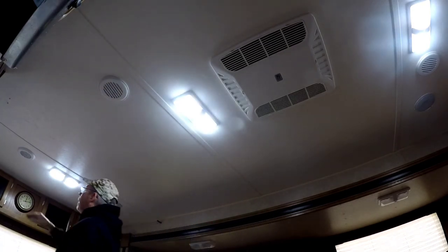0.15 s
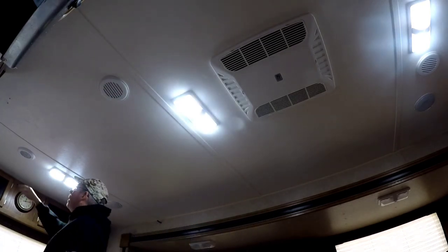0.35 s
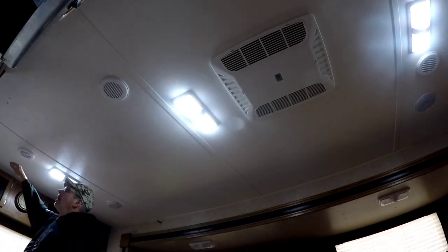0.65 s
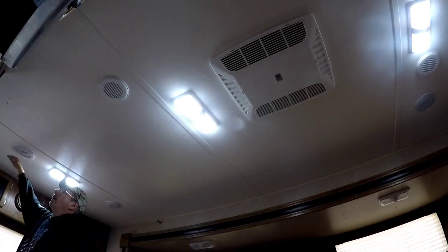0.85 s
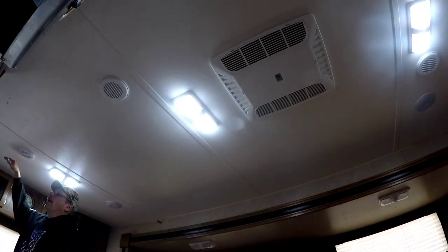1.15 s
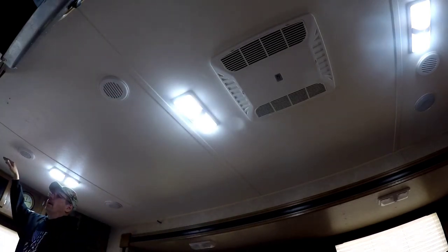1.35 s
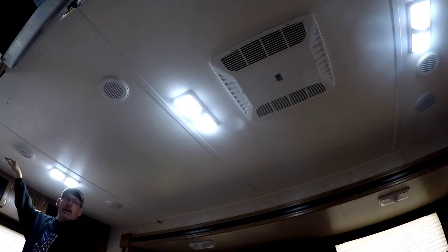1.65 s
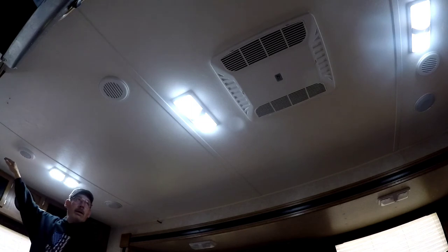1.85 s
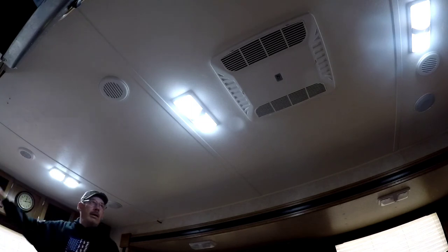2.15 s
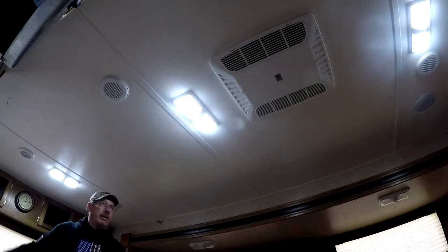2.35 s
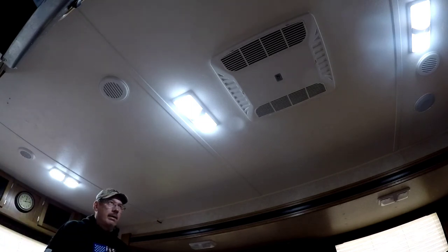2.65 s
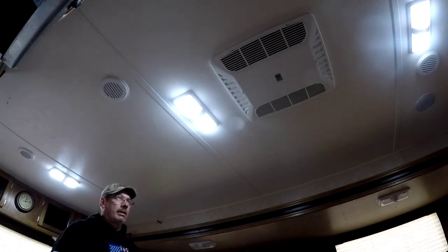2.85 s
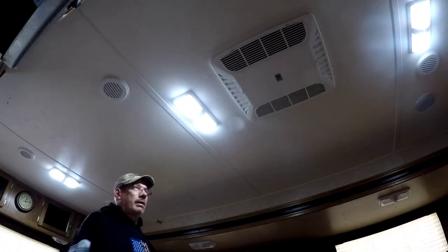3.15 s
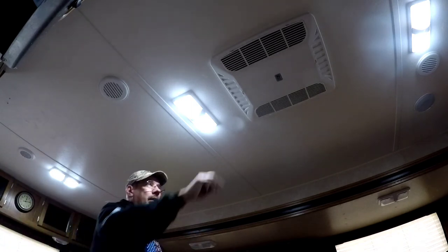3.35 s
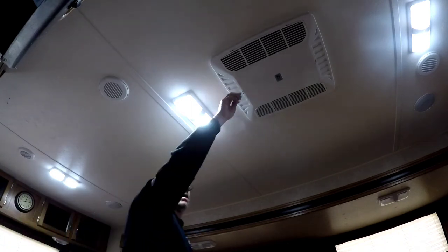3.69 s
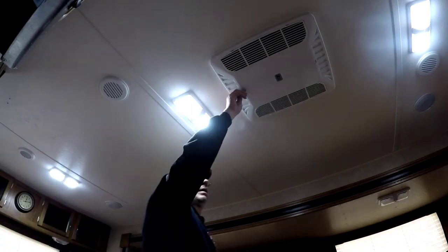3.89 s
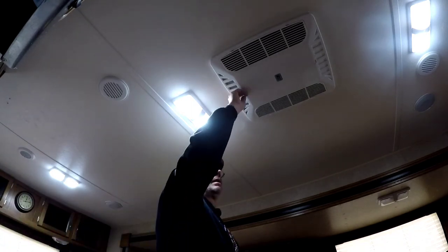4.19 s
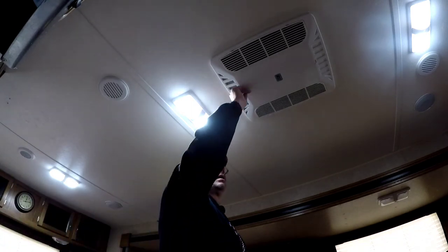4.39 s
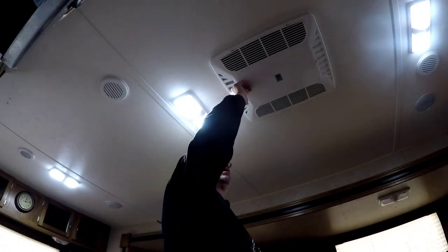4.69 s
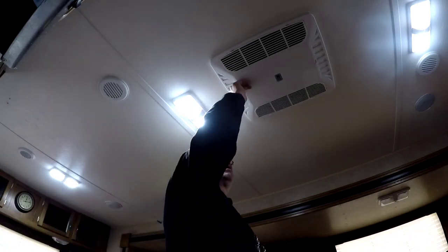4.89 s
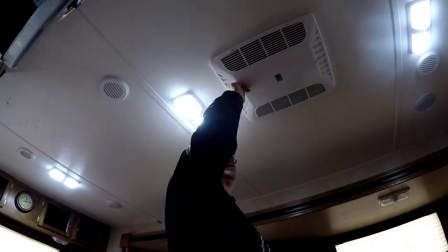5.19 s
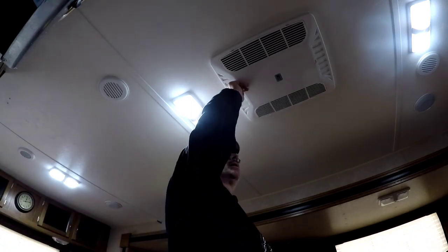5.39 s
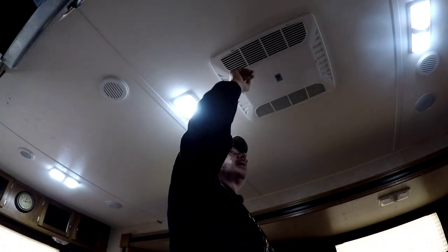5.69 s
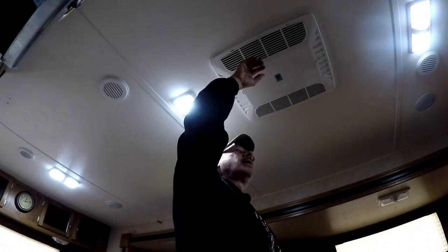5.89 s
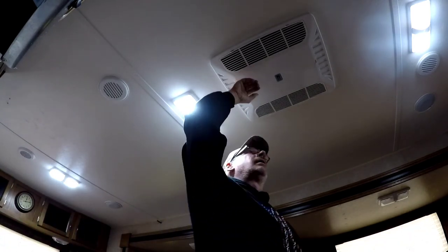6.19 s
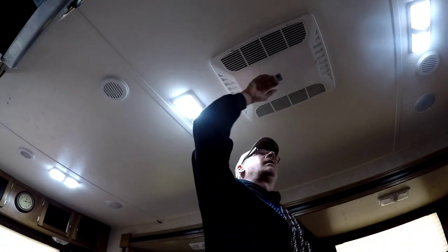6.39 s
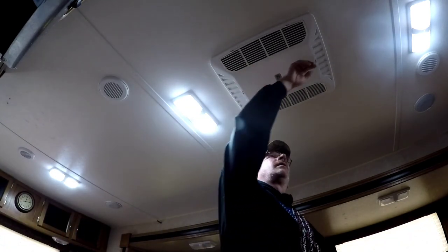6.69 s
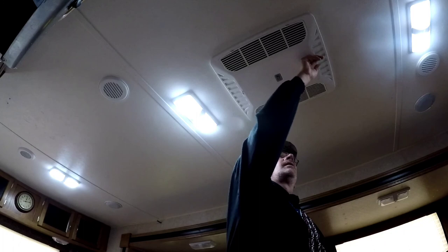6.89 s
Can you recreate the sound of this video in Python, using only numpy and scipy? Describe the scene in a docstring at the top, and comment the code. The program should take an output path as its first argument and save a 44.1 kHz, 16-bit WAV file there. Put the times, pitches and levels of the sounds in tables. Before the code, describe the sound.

Steady low drone and rushing air from a camper's ceiling air conditioner, as a hand slides a plastic louvre and clicks it into place.

```python
"""Air conditioner over a camper vent

A rooftop blower rumbles in the cabin's resonances, its motor hums, and air rushes through the
ceiling grille with a faint whistle. A hand brushes about, slides a plastic louvre and snaps it over
its catch. A step thumps through the floor into the microphone stand; gain control ducks on peaks."""
import sys
import numpy as np
from scipy import signal
from scipy.fft import rfft, irfft, next_fast_len
from scipy.io import wavfile
from scipy.ndimage import minimum_filter1d

SR = 44100
rng = np.random.default_rng(int(sys.argv[2]) if len(sys.argv) > 2 else 0)


def wav_record(signal):
    """Record a signal, one row per channel, as 16-bit PCM in the file named by sys.argv[1]."""
    frames = np.transpose(np.atleast_2d(signal))
    bounded = np.clip(frames, -1, 1)
    # unit amplitude maps onto the largest positive 16-bit level
    quanta = np.round(bounded * 32767).astype(np.int16)
    wavfile.write(sys.argv[1], SR, quanta)


N = 310464
TIME = np.arange(N) / SR


def from_db(db):
    """Decibels to gain."""
    return 10 ** (np.asarray(db) / 20)


def at_hz(points, hz):
    """Read a table on a log-frequency axis."""
    p = np.array(points, float)
    return np.interp(np.log(hz), np.log(np.maximum(p[:, 0], 1)), p[:, 1])


def fader(points):
    """A gain curve through points of seconds and dB."""
    return from_db(np.interp(TIME, *np.transpose(points)))


def drift(rate_hz):
    """Smooth random wander with a spread of 1."""
    hop = 40
    r = np.exp(-2 * np.pi * rate_hz * hop / SR)
    slow = signal.lfilter([1], [1, -2 * r, r * r], rng.standard_normal(N // hop + 4002))[4000:]
    return np.interp(np.arange(N) / hop, np.arange(len(slow)), (slow - slow.mean()) / slow.std())


def ring(x, hz, t60):
    """One mode: a unit click starts a decaying sine of height 1."""
    r, w = from_db(-60 / (t60 * SR)), 2 * np.pi * hz / SR
    return signal.lfilter([0, np.sin(w)], [1, -2 * r * np.cos(w), r * r], x + 1e-18)


def peak(hz, centre_hz, width_hz):
    """Power response of a resonance, 1 on top."""
    return 1 / (1 + (2 * (hz - centre_hz) / width_hz) ** 2)


def mode_power(hz, modes):
    """Left and right power per Hz of noise in sharp resonances."""
    return sum(from_db([[left_db], [right_db]]) ** 2 * peak(hz, centre, width) ** 2 / width
               for centre, width, left_db, right_db in modes)


def pan(hz):
    """Split the air's power between left and right."""
    # Stereo balance. Each row: frequency in Hz, left minus right in dB.
    balance = [(22, 7), (45, -17), (60, -3), (91, -9), (140, 0.5), (210, -5), (320, -2), (730, -2),
               (1110, -2.5), (1690, -0.2), (2400, -0.5), (3000, -3), (5000, 0.5), (6600, 0), (7750, 0.5),
               (8050, 0), (8600, -5.5), (11000, -0.5), (13600, -.9)]
    return from_db(at_hz(balance, hz) * [[1], [-1]])


def stereo_noise(power, bands, together_db, patchy_db, flicker_hz):
    """Noise shaped by power(hz); half-octave bands, counted from 16 Hz, flicker together and apart."""
    # How alike the two sides are. Each row: frequency in Hz, likeness from 0 to 1.
    likeness = [(30, 0.4), (65, 0.48), (150, 0.31), (250, 0.03), (350, 0.93), (500, 0.27), (1000, 0.02),
                (2000, 0.65), (3200, 1), (5000, 0.36), (7000, 0.37), (9000, 0.17), (14000, 0.4)]
    # Phase between the sides. Each row: frequency in Hz, left lead in radians.
    lead = [(0, -1.5), (340, -1.19), (950, 5.5), (1550, 8), (2240, 4.5), (2670, 7), (5770, 6), (6290, 7.5),
            (7490, 7.5), (8180, 9), (10900, 14.5), (11500, 9.5), (13000, 14.5), (13800, 11)]
    size = next_fast_len(N)
    hz = np.maximum(np.arange(size // 2 + 1) * SR / size, 1)
    common, apart = rfft(rng.standard_normal((2, size)))
    alike = np.clip(at_hz(likeness, hz), 0, 1)
    left = common * np.exp(1j * at_hz(lead, hz))
    right = alike * common + np.sqrt(1 - alike ** 2) * apart
    spectrum = np.array([left, right]) * np.sqrt(power(hz) * SR / 2)
    place = np.clip(2 * np.log2(hz / 16), bands[0], bands[-1])
    out, shared_db = 0, together_db * drift(4.6)
    for band in bands:
        share = np.clip(1 - abs(place - band), 0, 1)   # neighbouring shares sum to one
        flicker = from_db(shared_db + patchy_db * drift(flicker_hz))
        out = out + irfft(spectrum * share, size)[:, :N] * flicker
    return out


def rumble():
    """Turbulence at the blower, coloured by the cabin and its ceiling panels."""
    # The bed between resonances. Each row: frequency in Hz, noise density in dB.
    bed = [(12, -72), (22, -43), (34, -55.5), (48, -49), (62, -40.5), (76, -44.5), (100, -42), (130, -44.5),
           (190, -54), (255, -63.5), (310, -56.5), (350, -61), (385, -58), (420, -68), (520, -73.5)]
    # Cabin and panel resonances. Each row: centre and width in Hz, left and right level in dB.
    panels = [(37.2, 3.3, -48, -49), (52, 5, -50, -45), (85.5, 6.9, -30, -24), (109.6, 17, -46, -29),
              (431.5, 16, -46.5, -57)]

    def power(hz):
        return from_db(at_hz(bed, hz)) ** 2 * pan(hz) * (hz < 520) + mode_power(hz, panels)
    return stereo_noise(power, range(2, 11), together_db=1.3, patchy_db=0.35, flicker_hz=8.4)


def panel_drone():
    """Turbulence sets sharp ceiling panel modes droning above the rumble."""
    # Panel modes. Each row: centre and width in Hz, left and right level in dB.
    modes = [(351.3, 12, -40.5, -34), (373.6, 4.3, -45.5, -42), (399.8, 7, -48, -45.5)]
    # The drone's swells. Each row: time in seconds, gain in dB.
    swells = [(0, -7), (1.1, 2), (1.9, -1.5), (3.0, 1.5), (3.3, -13), (3.6, 2), (4.2, 1), (4.8, 3),
              (5.399, 0.5), (6.0, 2), (7.04, 2)]
    return fader(swells) * stereo_noise(lambda hz: mode_power(hz, modes), range(9, 10),
                                        together_db=0.2, patchy_db=0.2, flicker_hz=5.1)


def cabin_boom():
    """A low cabin mode hums at its own pitch, which wavers a little."""
    # The mode: pitch and waver in Hz, left and right level in dB, left lead in radians.
    mode = (66, 0.84, -31, -19, 0)
    # The boom swells and fades. Each row: time in seconds, gain in dB.
    swells = [(0, -1), (.22, -2.5), (.38, 3.5), (.8, 1.5), (.98, -17), (1.3, 3.5), (1.65, 0), (1.9, -18),
              (2.05, -1), (2.2, 0), (2.7, -5.5), (3.0, 1.5), (3.3, -1), (3.65, -12), (3.95, 2.5),
              (4.2, 0.5), (4.6, -9), (5.3, -12), (5.5, 0.5), (5.8, -9), (5.93, 3.5), (6.2, -8), (6.7, -4),
              (7.04, 3.5)]
    hz, waver_hz, left_db, right_db, lead = mode
    phase = 2 * np.pi * np.cumsum(hz + waver_hz * drift(1.36)) / SR
    level = np.sqrt(2) * fader(swells) * from_db(1.66 * drift(6.6))
    return level * from_db([[left_db], [right_db]]) * np.sin(phase + [[lead], [0]])


def motor():
    """Shaft harmonics, mains hum, and the hum's sidebands one shaft rate away."""
    # Motor tones. Each row: the shaft and mains multiples that add up to the pitch,
    # then left and right level in dB and left lead in radians.
    tones = [((0.99, 0), (-38.5, -23.5, 3.5)), ((0, 0.96), (-33.5, -40, 0.35)), ((3, 0), (-38.5, -31, 3.4)),
             ((0, 2), (-32, -29.5, -1.02)), ((5, 0), (-49, -34.5, -0.32)), ((0.97, 2), (-35, -46, -1.36)),
             ((6.03, 0), (-40.5, -35, -1.1)), ((0, 3), (-41, -37, 2.7)), ((-1, 4), (-50, -44, 0.18)),
             ((8.7, 0), (-45, -45.5, -1.85)), ((0, 4), (-45, -48.5, 1.9)), ((1, 4), (-48.5, -50.5, -0.18)),
             ((0, 5), (-55, -55, -0.25)), ((12, 0), (-41.5, -43.5, -0.9)), ((14, 0), (-55, -48.5, -0.79))]
    shaft_hz, mains_hz, speed_waver, waver_db = 28.5, 60.0, 0.003114, 1.37
    shaft = 2 * np.pi * np.cumsum(shaft_hz * (1 + speed_waver * drift(0.83))) / SR
    mains = 2 * np.pi * mains_hz * TIME
    out = 0
    for (shaft_multiple, mains_multiple), (left_db, right_db, lead) in tones:
        phase = shaft_multiple * shaft + mains_multiple * mains + rng.uniform(0, 2 * np.pi)
        level = np.sqrt(2) * from_db(waver_db * drift(1.45))
        out = out + level * from_db([[left_db], [right_db]]) * np.sin(phase + [[lead], [0]])
    return out


def air_rush():
    """Air hisses through the duct and grille and takes on their resonances."""
    # The broad tone of the air. Each row: frequency in Hz, relative level in dB.
    contour = [(250, -32), (430, -9.5), (559, -8), (854, -10.5), (1250, -4), (1360, -7.5), (1580, -9),
               (2550, -14), (3000, -15), (3370, -14.5), (4780, -22), (7520, -18), (8200, -25), (12300, -42),
               (14100, -39)]
    # Duct and grille resonances. Each row: centre and width in Hz, lift or notch in dB.
    duct = [(652, 95, 3.5), (2034, 33, -13), (2730, 74, -1.5), (3665, 40, -10.5), (4800, 200, 1.5),
            (961, 27, 5), (1226, 130, 0), (1553, 37, 9), (2110, 200, 4.5), (2745, 38, 4), (3620, 57, 5),
            (3710, 33, 6.5), (4320, 36, 4), (1359, 35, -5), (2490, 43, -6.5), (3450, 83, -6),
            (3980, 250, 2), (4880, 57, -8), (5300, 300, -0.5), (5880, 58, 5), (7600, 50, 1.5),
            (6280, 410, 3.5), (7700, 50, 0), (7610, 99, 3)]
    level_db = -29.5

    def power(hz):
        colour_db = sum(db * peak(hz, centre, width) for centre, width, db in duct)
        shape = from_db(at_hz(contour, hz) + colour_db) ** 2 * (hz > 430)
        return from_db(level_db) ** 2 * shape / np.sum(shape * hz[1]) * pan(hz)
    return stereo_noise(power, range(10, 20), together_db=0.79, patchy_db=0.6, flicker_hz=12.0)


def whistle():
    """An edge tone that hops between two pitches and comes in random puffs."""
    # The whistle swells and fades. Each row: time in seconds, gain in dB.
    swells = [(0, 1), (.4, 0), (.67, 5), (.85, 2.5), (.96, -10), (1.05, 4.5), (1.17, -0.5), (1.3, 5),
              (1.6, -3), (1.86, 7.5), (2.02, -3), (2.14, 6), (2.4, -3), (2.65, -1), (2.9, 0.5), (3.15, 0.5),
              (3.4, 4), (3.8, -4), (3.97, 1.5), (4.2, -2), (4.7, -1), (4.87, -1), (5.08, 1), (5.3, 0.5),
              (5.4, -4), (5.55, 3.5), (5.7, -3.5), (5.95, -6), (6.1, 1), (6.3, 2), (6.6, 2), (6.82, 4.5),
              (7.04, 0)]
    centre_hz, hop_hz, puff_rate_hz, level_db = 3014, 85, 55, -48.5
    hz = centre_hz + hop_hz * np.tanh(1.6 * drift(16) - 0.3)
    phase = 2 * np.pi * np.cumsum(hz) / SR
    mid, side = (drift(puff_rate_hz) * np.cos(phase) + drift(puff_rate_hz) * np.sin(phase)
                 for _ in range(2))
    return fader(swells) * from_db(level_db + 1.1 * drift(16)) * (mid + 0.45 * side * [[1], [-1]])


def swishes_and_chirp():
    """Brief swishes of a brushing hand, and one short chirp of the vent's whistle."""
    # Noise swells. Each row: start and length in seconds, level in dB, centre in Hz, width in octaves.
    swells = [(1.867, 0.049, -51, 6000, 1.5), (2.126, 0.085, -43.5, 6240, 0.58),
              (2.13, 0.085, -44, 1450, 0.5), (2.608, 0.029, -38, 3150, 0.063),
              (4.791, 0.069, -38, 3000, 1.5), (5.555, 0.12, -45.5, 3500, 2),
              (5.989, 0.046, -46, 6000, 0.83), (6.76, 0.063, -40, 1250, 0.12)]
    out = np.zeros((2, N))
    for start, length, db, hz, octaves in swells:
        i, n = round(start * SR), round(length * SR)
        edges = np.minimum(hz * 2 ** (octaves / 2 * np.array([-1, 1])), [12000, 15000])
        band = signal.butter(2, edges, "band", fs=SR, output="sos")
        mid, side = signal.sosfilt(band, rng.standard_normal((2, 9000)))[:, :n]
        swell = from_db(db) * np.sin(np.pi * np.arange(n) / n) ** 3
        out[:, i:i + n] += swell * (mid + 0.6 * side * [[1], [-1]]) / mid.std()
    return out


def louvre_slide():
    """Plastic sticks and slips in its guide: uneven grains, strongest mid-stroke."""
    # Three ticks of the sliding louvre, the middle one strongest. Each row: time in seconds, peak in dB.
    accents = [(3.902, -27), (3.948, -21), (3.965, -27)]
    start_s, fastest_s, end_s = 3.895, 3.95, 4.056
    level_db, fade_db_per_s, grains_per_s = -40.5, 50, 4000
    t = start_s + np.arange(round((end_s - start_s) * SR)) / SR
    ramps = np.clip(np.minimum(t - start_s, end_s - t) / 0.033, 0, 1)
    stroke = ramps * from_db(level_db - fade_db_per_s * abs(t - fastest_s))
    plastic = signal.butter(1, [800, 3000], "band", fs=SR, output="sos")
    grains = rng.laplace(size=(2, 9000)) * (rng.random((2, 9000)) < grains_per_s / SR)
    mid, side = signal.sosfilt(plastic, grains[:, :len(t)])
    out = np.zeros((2, N))
    out[:, round(start_s * SR):][:, :len(t)] = stroke * (mid + 0.67 * side * [[1], [-1]]) / mid.std()
    click = signal.sosfilt(plastic, signal.sosfilt(plastic, np.arange(400) == 0))
    for accent_s, accent_db in accents:
        out[:, round(accent_s * SR):][:, :400] += from_db(accent_db) * click / abs(click).max()
    return out


def louvre_snap():
    """The louvre slips over its catch, and a burst of uneven contacts rings the plastic blade."""
    # Blade modes. Each row: pitch in Hz, relative level in dB, seconds to fall 60 dB.
    modes = [(338, -10, 0.1), (513, -6, 0.018), (625, -3.5, 0.034), (983, -4, 0.053), (1229, 2, 0.1),
             (1520, -4.5, 0.04), (1747, -7, 0.052), (2085, -3, 0.024), (3130, -5, 0.027)]
    start_s, length_s, gain_db = 4.826, 0.024, -23
    i, n = round(start_s * SR), round(length_s * SR)
    mid, side = rng.standard_normal((2, 2000)) * (rng.random(2000) < 0.25)
    progress = 0.45 + 0.63 * TIME[:n] / 0.0056
    force = 1.37 * progress * np.exp(1 - progress)   # hardest about 5 ms in
    clicks = np.zeros((2, N))
    clicks[:, i:i + n] = force * (mid + 0.81 * side * [[1], [-1]])[:, :n]
    release = np.arange(N) == i + 40
    clicks += 4.0 * release   # the catch lets go
    blow = 0.59 * clicks + 11 * release   # and knocks the whole blade
    body = sum(from_db(db) * ring(blow, hz, t60) for hz, db, t60 in modes)
    crack = signal.sosfilt(signal.butter(1, [1500, 6500], "band", fs=SR, output="sos"), clicks)
    return from_db(gain_db) * (0.063 * body + 0.3 * crack)


def footstep():
    """One soft blow rings the floor and the microphone stand, each mode with its own polarity."""
    # Floor and stand modes. Each row: pitch in Hz, left and right level in dB,
    # a further signed gain on the right, seconds to fall 60 dB.
    modes = [(148.5, -4, -2, -1.37, 0.14), (183.7, -10.5, -7.5, -1.07, 0.89),
             (288.4, -1, 1.5, -1.12, 0.064), (468, -2, -6, -1.1, 0.03), (589, 2.5, -6, 0.79, 0.031),
             (716, -7, 0.5, 0.77, 0.019)]
    start_s, rise_s = 4.0488, 0.0032
    blow = np.zeros(N)
    blow[round(start_s * SR):][:90] = np.hanning(90) / np.hanning(90).sum()
    rise = np.clip((TIME - start_s) / rise_s, 0, 1)   # the floor takes a moment to answer in full
    thump = sum((-1) ** k * from_db([[left_db], [right_db]]) * [[1], [right_gain]] * ring(blow, hz, t60)
                for k, (hz, left_db, right_db, right_gain, t60) in enumerate(modes))
    return signal.sosfilt(signal.butter(6, 840, fs=SR, output="sos"), rise * thump)


def scene():
    """The air conditioner, the hand and the step, mixed in stereo."""
    air = rumble() + motor() + cabin_boom() + panel_drone() + air_rush() + whistle()
    at_vent = swishes_and_chirp() + louvre_slide() + louvre_snap()
    dull = signal.butter(2, 9500, fs=SR, output="sos")   # far off and turned away
    return air + signal.sosfilt(dull, at_vent) + footstep()


def record(dry):
    """Gain ducks on peaks, holds and climbs back steadily; peaks are rounded and the top is cut."""
    threshold_db, release_rate, gain_db, ceiling, cutoff_hz = -5.5, 12.5, 1.08, 0.82, 14700
    lookahead_s, attack_s, settle_s, hold_s = 0.0015, 0.0019, 0.0098, 0.26
    sidechain = signal.sosfilt(signal.butter(2, 125, "high", fs=SR, output="sos"), dry)   # no deep bass
    over_db = np.maximum(20 * np.log10(abs(sidechain).max(axis=0) + 1e-9) - threshold_db, 0)
    over_db = np.append(over_db, np.zeros(round(lookahead_s * SR)))[-N:]
    hold = round(hold_s * SR) // 2 * 2 + 1
    held = -minimum_filter1d(-over_db, hold, origin=hold // 2)
    held = np.maximum(held, 9.5 * (TIME < 0.2))   # opens ducked, as after a loud sound
    climb = release_rate * TIME
    duck = np.maximum.accumulate(held + climb) - climb
    # most of the duck comes at once, the rest settles in
    fast, slow = (signal.lfilter([1 - r], [1, -r], duck, zi=[r * duck[0]])[0]
                  for r in np.exp(-1 / SR / np.array([attack_s, settle_s])))
    ducked = dry * from_db(gain_db - 0.74 * fast - 0.32 * slow)
    rounded = ceiling * np.tanh(ducked / ceiling)
    return signal.sosfilt(signal.cheby2(12, 70, cutoff_hz, fs=SR, output="sos"), rounded)


dry = scene()
out = record(dry)
wav_record(out)
```